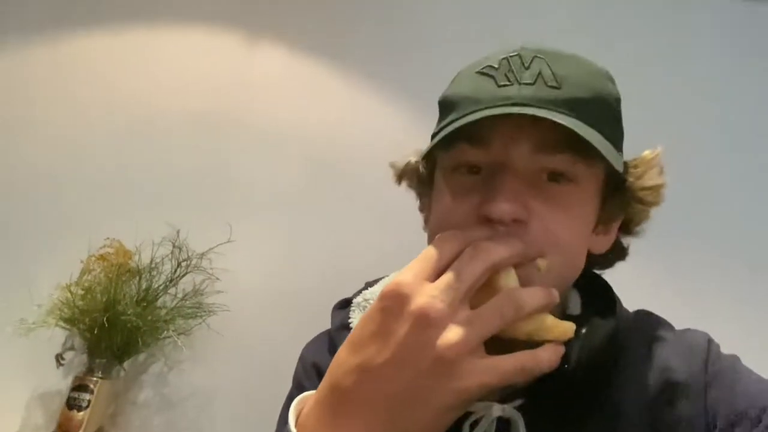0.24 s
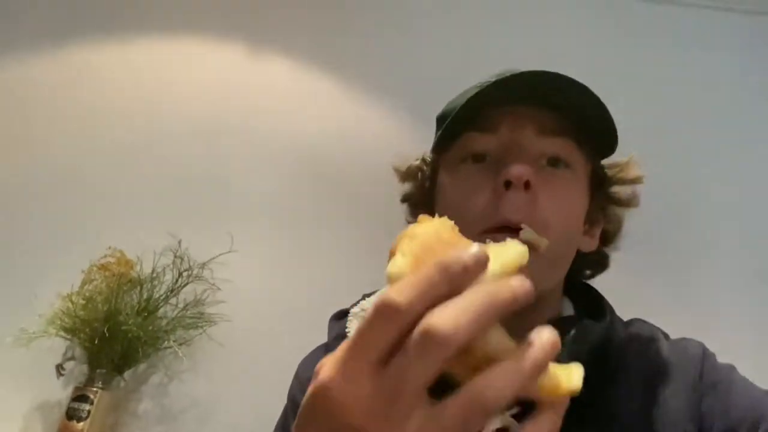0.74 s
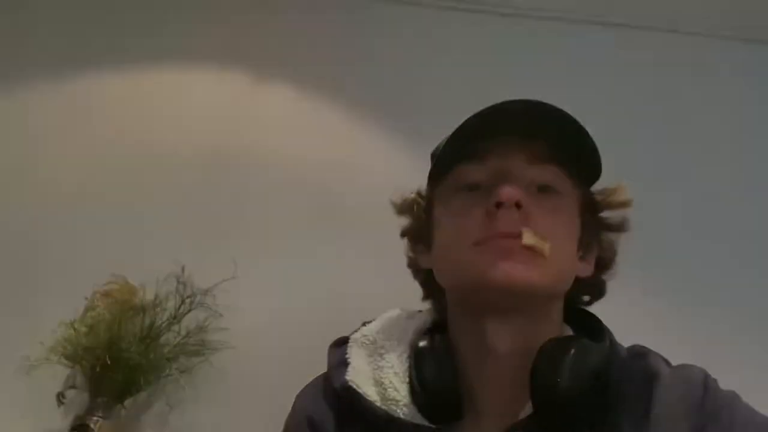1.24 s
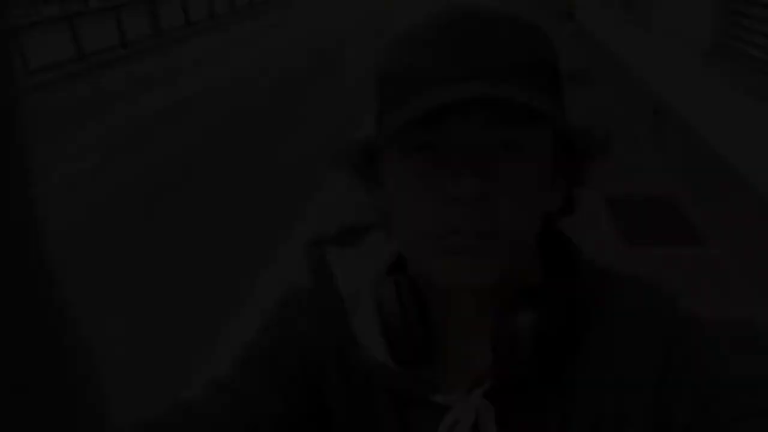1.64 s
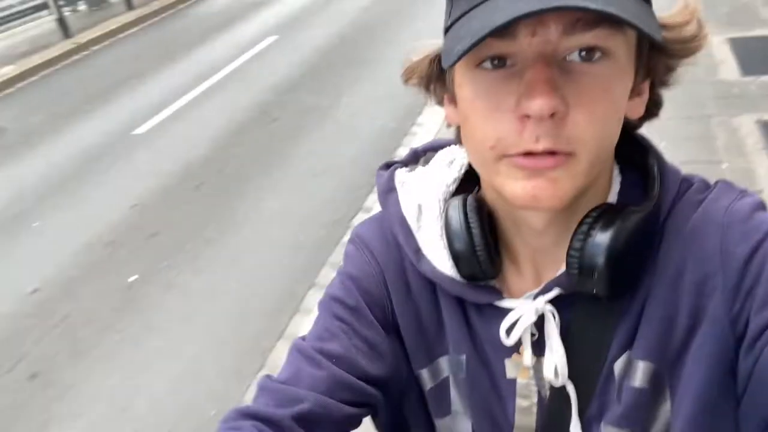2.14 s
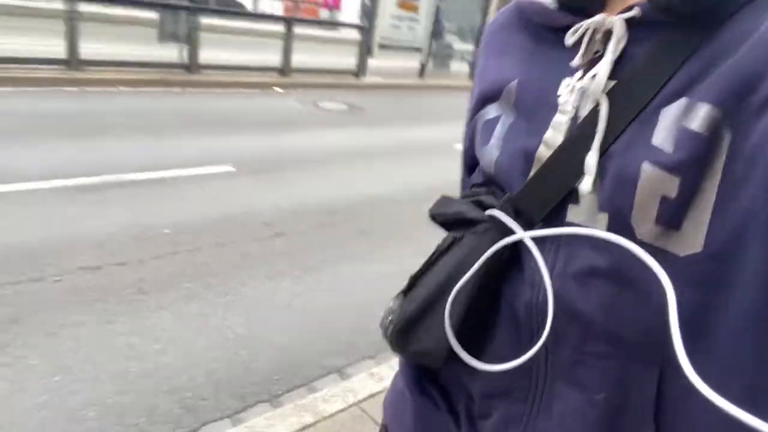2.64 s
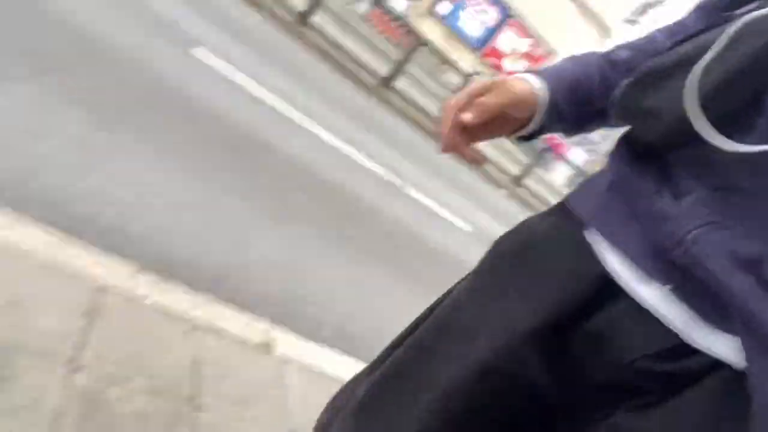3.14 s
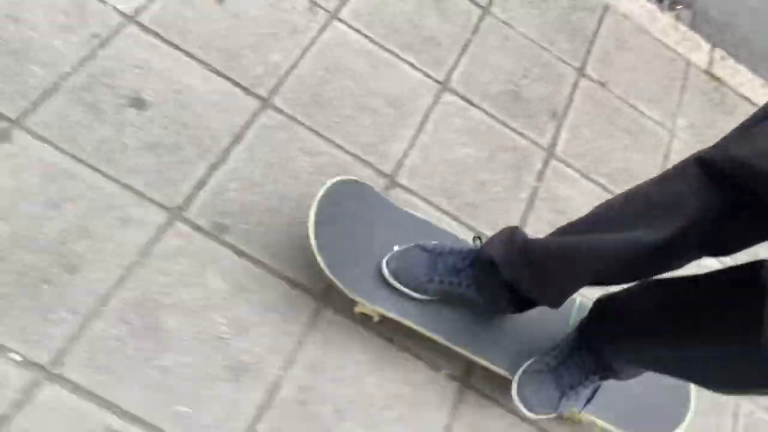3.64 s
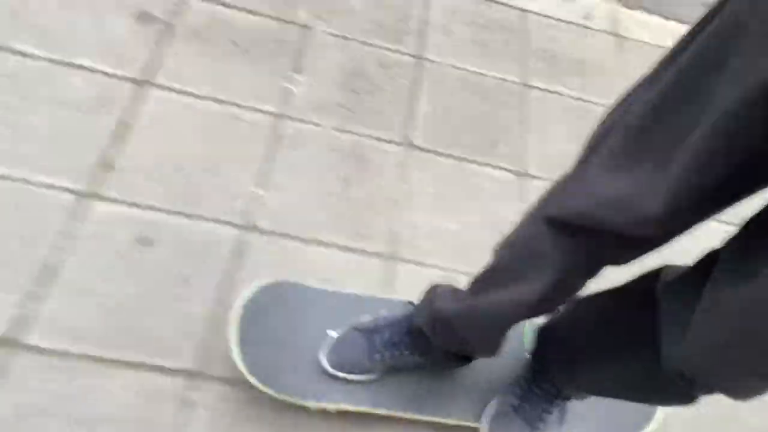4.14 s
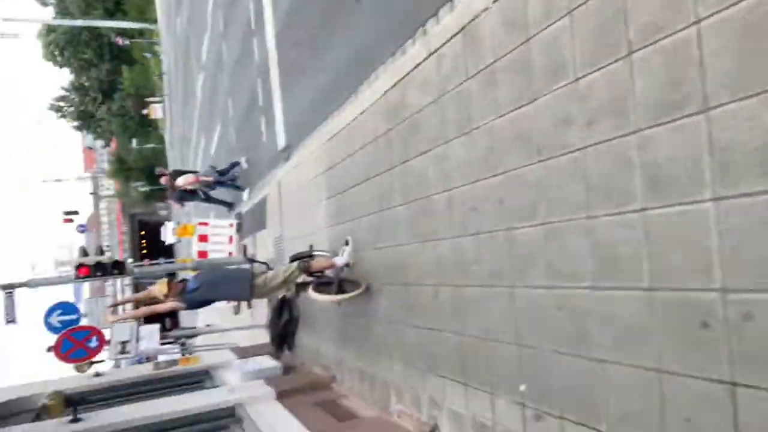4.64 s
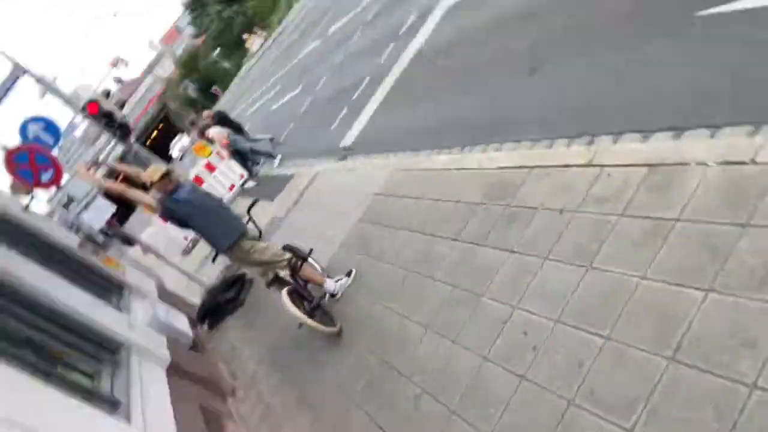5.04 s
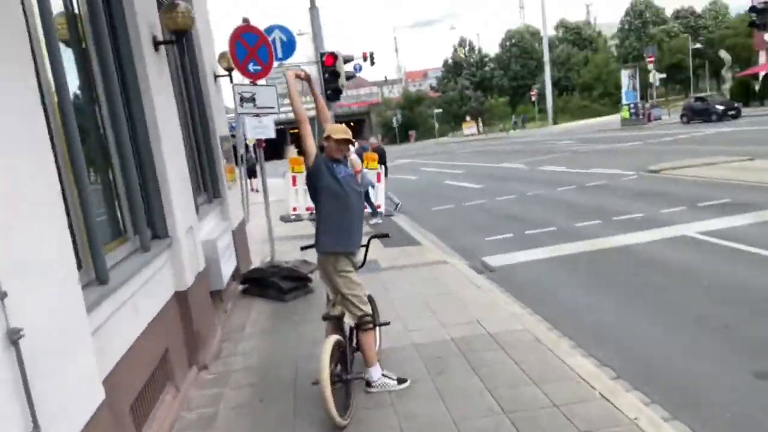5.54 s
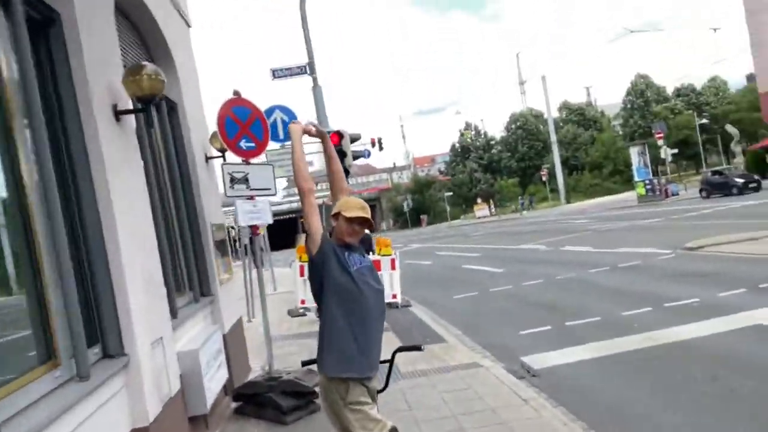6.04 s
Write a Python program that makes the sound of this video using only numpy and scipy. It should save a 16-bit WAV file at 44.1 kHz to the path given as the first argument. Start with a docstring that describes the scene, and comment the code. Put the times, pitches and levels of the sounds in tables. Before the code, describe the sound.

Low appliance hum indoors, then short muffled wind buffets and two tiny bright ticks. A skateboard starts rolling on gritty concrete outdoors: continuous hollow wheel rumble, truck chatter, fine hiss and a fast, slightly uneven clatter over tile joints. The rider holds the microphone near the board, sharpest around the middle, then turns it; the sound shifts right, softens and keeps rolling to the end with little echo.

```python
"""Skateboard on paved sidewalk

A quiet humming room gives way to short gusts of wind and a skateboard rolling along a city sidewalk.
Front and rear axle knock in turn over the tile joints as bursts of decaying modes and filtered noise.
Between the knocks, shaped noise and randomly kicked modes make the wheels rumble on gritty concrete.
The rider swings the microphone round: the board wanders near the middle, swings right, partly returns."""
import sys
import numpy as np
from scipy import signal
from scipy.fft import rfft, irfft, next_fast_len
from scipy.io import wavfile
from scipy.ndimage import uniform_filter1d, map_coordinates

SR = 44100
rng = np.random.default_rng(int(sys.argv[2]) if len(sys.argv) > 2 else 0)


def master_out(mix):
    """Clip the mix to full scale and print it as 16-bit PCM to the path in sys.argv[1]."""
    frames = np.transpose(np.atleast_2d(mix))
    ceiling = np.clip(frames, -1, 1)
    pcm = np.round(ceiling * 32767).astype(np.int16)
    wavfile.write(sys.argv[1], SR, pcm)


N = 277389
TIME = np.arange(N) / SR

# modes of wheels, trucks and small steel parts at each end of the board: (f/Hz, relative level/dB, t60/s)
FRONT_WHEEL = [(504, -2, 0.047), (710, -9.5, 0.071)]
FRONT_TRUCK = [(786, -2, 0.019), (907, 4, 0.03), (1040, -3, 0.031), (1141, 5.5, 0.028), (1280, 0, 0.028),
               (1416, -9, 0.053), (1572, -5, 0.04)]
FRONT_STEEL = [(1863, 3, 0.062), (2023, -1.5, 0.059), (2320, 2.5, 0.03), (3237, -8, 0.075)]
REAR_WHEEL = [(530, -8, 0.056), (679, -8, 0.054)]
REAR_TRUCK = [(887, -5.5, 0.031), (1015, -0.5, 0.049), (1088, 4.5, 0.041), (1312, -3, 0.03),
              (1554, -6, 0.041), (1726, -7.5, 0.024)]
REAR_STEEL = [(1814, -0.37, 0.029), (2213, 0.97, 0.056), (2537, -1.2, 0.031), (2847, -2.6, 0.051)]


def from_db(db):
    """Decibels to gain."""
    return 10 ** (np.asarray(db) / 20)


def rms_one(x):
    """Scale to unit rms."""
    return x / np.sqrt(np.mean(x ** 2) + 1e-20)


def in_time(rows):
    """Each column of a curve table at every sample."""
    s, *columns = np.transpose(rows)
    return [np.interp(TIME, s, column) for column in columns]


def at_hz(points, hz):
    """Read a spectrum on a log-frequency axis."""
    f, value = np.transpose(points)
    return np.interp(np.log(hz + 1e-3), np.log(f), value)


def drift(rate_hz):
    """Smooth random movement of spread 1: lowpassed noise, computed at every 40th sample."""
    pole = np.exp(-2 * np.pi * rate_hz * 40 / SR)
    raw = rng.standard_normal(N // 40 + 2002)
    slow = signal.lfilter([1], [1, -2 * pole, pole * pole], raw)[2000:]
    return np.interp(np.arange(N) / 40, np.arange(len(slow)), rms_one(slow))


def noise(spectrum):
    """Coloured stereo noise, rms 1: its two sides are related in the bass, nearly unrelated in the treble."""
    # how alike the two sides of a noise source are: (f/Hz, left-right correlation)
    likeness = [(30, 0.69), (120, 0.65), (250, 0.54), (600, 1), (1400, 0.4), (1900, 0.022), (6000, 0.018),
                (16000, 0.045)]
    size = next_fast_len(N)
    hz = np.fft.rfftfreq(size, 1 / SR)
    mid, side = rfft(rng.standard_normal((2, size)))
    alike = np.clip(at_hz(likeness, hz), -1, 1)
    both = np.sqrt(1 + alike) * mid + np.sqrt(1 - alike) * side * [[1], [-1]]
    return rms_one(irfft(both * from_db(at_hz(spectrum, hz)), size)[:, :N])


def ring(modes, age, detune, scatter_db, rise_s, apart_hz=1900):
    """One blow on a set of modes; the higher a mode, the more its phase differs between the two sides."""
    hz, level_db, t60 = np.transpose(modes)[:, :, None]
    tune, strength, turn = rng.standard_normal((3, len(hz), 1))
    start = 2 * np.pi * rng.random((len(hz), 1))
    split = turn * np.minimum((hz / apart_hz) ** 3, 1) * np.array([1, -1])[:, None, None]
    waves = np.sin(2 * np.pi * hz * (1 + detune * tune) * age + start + split)
    decay = from_db(level_db + scatter_db * strength - 60 * age / t60)
    return (waves * decay).sum(axis=1) * (1 - np.exp(-age / rise_s))


def kicked(modes, per_s, spread_db):
    """Stone chips standing proud of the concrete kick a set of modes at random; rms 1."""
    happens = rng.random(N) < per_s / SR
    sizes = from_db(spread_db * np.minimum(rng.exponential(1, N), 3)) * happens
    out = np.zeros((2, N))
    for hz, db, t60 in modes:
        pole = from_db(-60 / (t60 * SR))
        turn = 2 * np.pi * hz / SR
        kicks = sizes * (rng.standard_normal(N) + .5 * rng.standard_normal((2, N)))
        resonator = [1, -2 * pole * np.cos(turn), pole * pole]
        out += from_db(db) * signal.lfilter([0, np.sin(turn)], resonator, kicks + 1e-18)
    return rms_one(out)


def place(x, pan_db, lag_ms):
    """Pan and delay between the sides: positive pan is louder on the left, positive lag is later there."""
    lag = lag_ms / 1000
    return np.array([from_db(side * pan_db / 2)
                     * map_coordinates(channel, [(TIME - side * lag / 2) * SR], order=3)
                     for channel, side in zip(x, (1, -1))])


def rightward():
    """Sine of the board's bearing: how far it lies to the right, -1 to 1."""
    # where the board lies from the microphone: (t/s, angle to the right/degrees)
    bearing = [(1.65, 10.5), (2.8, -5), (3.15, -11), (3.65, 2.5), (4.1, -3), (4.5, 40.5), (5.1, 38.5),
               (5.4, 12), (5.85, 6), (6.29, 18.5)]
    return np.sin(np.radians(in_time(bearing)[0]))


def room(fade_s=0.15, end_s=2.14, noise_db=-42, hum_pan_db=4, lag_ms=-0.31):
    """An appliance on the left hums in wavering partials over soft noise; both fade under the rolling board."""
    # partials of the hum: (f/Hz, level/dB, depth of waver)
    partials = [(102.3, -51.5, .35), (172.6, -42, .22), (301, -42.5, .1), (500.6, -49, .25)]
    # colour of the room noise: (f/Hz, relative level/dB)
    room_colour = [(20, -31), (35, -30.5), (48, 1), (70, -18), (200, 1.5), (270, -10), (750, -7.5),
                   (1000, -10), (1500, -15), (2000, -20.5), (5000, -34.5), (9000, -47), (14000, -51.5),
                   (16000, -77)]
    hum = np.zeros(N)
    for hz, db, waver in partials:
        swing = (1 + waver * (drift(11) + 1j * drift(7))) / np.sqrt(1 + 2 * waver ** 2)
        hum += from_db(db) * np.sqrt(2) * np.real(swing * np.exp(2j * np.pi * hz * TIME))
    out = hum * from_db(np.array([[1], [-1]]) * hum_pan_db / 2)
    out = out + from_db(noise_db + 1.0 * drift(1.0)) * noise(room_colour)
    return place(out, 0, lag_ms) * np.clip((end_s - TIME) / fade_s, 0, 1)


def rustles(grain_db=3.5):
    """A sleeve brushes softly past the microphone: swells of grainy noise."""
    # each swell of the cloth: (t/s, level/dB, half length/s)
    brushes = [(0.854, -58, 0.13), (1.432, -53.5, 0.06), (1.547, -52.5, 0.046)]
    # colour of the cloth: (f/Hz, relative level/dB)
    cloth = [(700, -6), (2000, 2), (3100, -5), (5500, -14), (14000, -24)]
    level = sum(from_db(db) * np.exp(-((TIME - s) / half_s) ** 2) for s, db, half_s in brushes)
    return level * from_db(grain_db * drift(120)) * noise(cloth)


def air(wind_gain_db=0.5, gust_gain_db=1.5):
    """Gusts and headwind buffet the microphone as low noise, over low street noise and a finger's rumble."""
    # low street noise, with a finger's handling rumble on the microphone near 1.9 s: (t/s, level/dB)
    low_noise_level = [(1.4, -39), (1.9, -21.5), (2.2, -31), (3.9, -37.5), (4.4, -34.5), (5.2, -34.5),
                       (5.8, -37.5)]
    # light headwind: (t/s, level before gain/dB)
    headwind = [(1.4, -33.5), (2.2, -38.5), (2.75, -37), (3.6, -40), (4.7, -35), (5.3, -34.5), (5.6, -36.5)]
    # gusts: (t/s, level before gain/dB, rise constant/s, hold/s, fall constant/s)
    gusts = [(1.13, -23.5, 0.051, 0.037, 0.022), (1.22, -22, 0.032, 0.034, 0.012),
             (1.293, -27, 0.013, 0.024, 0.04), (1.875, -23.5, 0.12, 0.049, 0.034)]
    # colours of street and handling noise, headwind, and the deeper, wider gusts: (f/Hz, relative level/dB)
    low_noise_colour = [(70, -19), (130, 2), (185, 6), (260, 4), (340, -1), (480, -11), (1000, -24),
                        (3000, -58)]
    wind_colour = [(15, -32), (30, -18), (45, 0), (70, 8.5), (100, -3.5), (150, -6), (300, -36),
                   (1000, -96)]
    gust_colour = [(20, -17), (55, 8), (100, 4), (160, -9), (280, -18), (600, -68)]
    (low_noise_db,), (headwind_db,) = in_time(low_noise_level), in_time(headwind)
    outdoors = np.clip((TIME - .96) / 0.11, 0, 1)
    strength = 0
    for s, db, rise_s, hold_s, fall_s in gusts:
        shape = np.minimum((TIME - s) / rise_s, (s + hold_s - TIME) / fall_s)
        strength = np.maximum(strength, from_db(db + gust_gain_db) * np.exp(np.minimum(shape, 0)))
    out = from_db(low_noise_db) * noise(low_noise_colour)
    for colour, gain in ((wind_colour, from_db(headwind_db + wind_gain_db)), (gust_colour, strength)):
        wind = noise(colour)
        # level the noise first, so the air speed alone sets its strength
        loudness = np.sqrt(uniform_filter1d(np.mean(wind ** 2, axis=0), size=4000))
        out += gain * wind / loudness
    return outdoors * out


def ticks(t60=0.045):
    """Two faint, bright ticks before the board comes in: decaying bursts of narrow-band noise."""
    # ticks: (t/s, level/dB, f/Hz)
    tick_rows = [(1.409, -48, 6500), (1.462, -56, 8000)]
    out = np.zeros(N)
    for s, db, hz in tick_rows:
        age = np.maximum(TIME - s, 0)
        band = signal.butter(2, [hz * .94, hz * 1.06], "band", fs=SR, output="sos")
        burst = rms_one(signal.sosfilt(band, rng.standard_normal(N)))
        out += burst * from_db(db - np.minimum(60 * age / t60, 200)) * (1 - np.exp(-age / 0.0014))
    return out


def rolling(rumble_gain_db=-1.06, chatter_db=-39.0, pebble_db=-39.5, hiss_db=-50.0, rattle_db=-12.0,
            knock_db=-5.0, chatter_follows=1.0, hiss_follows=0.48, chatter_facing=0.57, hiss_side_db=-1.5,
            bump_db=1.4, grain_db=2.0, scuff_db=1.5, patch_db=2.5, hiss_rise_s=0.057,
            start_s=1.583, plain_roll_db=-27):
    """Rough concrete keeps wheels, trucks and steel ringing; coarse patches raise chatter and hiss together."""
    # rumble of the wheels: (t/s, level before gain/dB)
    roll = [(1.68, -27.5), (2.5, -26.5), (4.16, -28.5), (4.5, -28), (5.07, -31), (5.52, -29.5), (6.29, -31)]
    # how squarely the microphone faces the board: (t/s, chatter gain before scaling/dB)
    facing_curve = [(1.6, -1), (2.3, -3), (3.0, 0), (3.6, 1.5), (4.3, -5.5), (4.65, -20), (5.0, -6),
                    (5.5, -2.5), (6.29, 1.5)]
    # the wheels scuff over sand: (t/s, rise of chatter and hiss/dB, half length/s)
    sandy_patches = [(3.884, 7, 0.085), (4.36, 9, 0.035), (4.964, 3, 0.14)]
    # colours of the rolling noise, low to high: (f/Hz, relative level/dB)
    rumble_colour = [(150, -23), (300, -3), (410, 0.5), (520, 4.5), (590, 4.5), (700, 5), (830, -7),
                     (1100, -12), (1600, -29), (4000, -61)]
    chatter_colour = [(600, 1.5), (900, -16), (1100, 3), (1400, -6), (1900, -8), (2600, -35)]
    hiss_colour = [(1300, 14.5), (1900, 18), (2400, 13), (3100, 12.5), (3800, 6.5), (4650, 5), (6500, 2),
                   (9000, -2.5), (13000, -7), (16000, -32)]
    (roll_db,), (facing,) = in_time(roll), in_time(facing_curve)
    effort = roll_db - plain_roll_db
    patches = patch_db * drift(15.6)
    patches += sum(db * np.exp(-((TIME - s) / half_s) ** 2) for s, db, half_s in sandy_patches)

    wheel_knocks = kicked(FRONT_WHEEL + REAR_WHEEL, per_s=70, spread_db=1.5)
    rumble = noise(rumble_colour) + from_db(knock_db) * wheel_knocks
    rumble = from_db(roll_db + rumble_gain_db) * rumble

    pebbles = kicked(FRONT_TRUCK + REAR_TRUCK, per_s=110, spread_db=0.5)
    chatter = from_db(chatter_db) * noise(chatter_colour) + from_db(pebble_db) * pebbles
    chatter = chatter * from_db(chatter_follows * effort + chatter_facing * facing + patches)

    grains = grain_db * drift(250) + scuff_db * drift(42)   # single grains, and short scuffs
    rattle = kicked(FRONT_STEEL + REAR_STEEL, per_s=59, spread_db=3.5)
    gritty = from_db(grains) * noise(hiss_colour) + from_db(rattle_db) * rattle
    hiss = from_db(hiss_db + hiss_follows * effort + hiss_side_db * rightward() + patches) * gritty
    hiss *= 1 - np.exp(-np.maximum(TIME - start_s, 0) / hiss_rise_s)   # the rumble comes first

    under_way = np.clip((TIME - start_s) / .005, 0, 1)
    return (rumble + chatter + hiss) * from_db(bump_db * drift(15)) * under_way


def joints(thump_db=0.0, bounce_db=-0.65, clack_db=0.0, rasp_db=-0.34, crack_db=-0.5, bounce_t60=0.043,
           seated_s=0.019, snap_db=-1.0, snap_s=0.00039, grit_t60=0.051, grit_rise_s=0.00013,
           grain_db=4.0, steel_db=-4.0, plain_clack_db=-25.5, hardness=0.76):
    """Both wheels of an axle drop in ms apart, bounce until seated, shake deck and truck, rasp on the edge."""
    # axle crossings, front and rear in turn, levels before trim: (t/s, wheel bounce level/dB,
    # deck thump level/dB, truck clack level/dB, rasp and steel ring level/dB, grit crack level/dB,
    # second wheel delay/ms, second wheel relative level/dB, bounce f/Hz)
    crossings = [(1.627, -22.5, -30.5, -35, -43, -54, 4.8, 3, 490),
                 (1.695, -24.5, -41, -35, -37, -51, 13.5, 9, 637),
                 (1.759, -22.5, -31.0, -35, -41, -52.5, 11, -5, 490),
                 (1.83, -17.5, -23, -27.5, -32.5, -44.5, 6.7, -9, 660),
                 (1.89, -23.5, -22, -35, -41, -54, 6.8, 10, 530),
                 (1.962, -21.5, -28, -34, -44, -53, 9, -12, 573),
                 (2.022, -17, -30, -26.5, -36.5, -49, 6.7, 4, 685),
                 (2.092, -22, -24, -31.5, -44.5, -49.5, 7.9, -5, 520),
                 (2.151, -24, -23.5, -36.5, -61, -56, 7.2, -3, 515),
                 (2.223, -24, -27, -35, -42, -51.5, 6.1, -9, 552),
                 (2.278, -20.5, -30, -32.0, -42.5, -52.5, 11.1, -4, 584),
                 (2.349, -15, -24.5, -22.5, -35.5, -45, 2.63, -2.5, 675),
                 (2.404, -18.5, -25, -23, -34, -45, 8.8, -8, 633),
                 (2.474, -21, -32, -31, -41, -47.5, 7, -9, 570),
                 (2.53, -29, -28.5, -25, -37.5, -44, 4.1, 1, 610),
                 (2.602, -13.0, -27, -23.5, -31, -41.5, 7.7, -1.5, 620),
                 (2.662, -20.5, -46, -29, -43, -52, 7, -16, 547),
                 (2.735, -12, -28, -21, -33.5, -41.5, 8, -9.5, 610),
                 (2.79, -16, -26.5, -18.5, -32.5, -40, 1.58, -2, 587),
                 (2.86, -17.5, -30, -24.5, -31.5, -41, 7, -5.5, 596),
                 (2.919, -13, -28.5, -23.5, -31.5, -43, 5.6, -16, 666),
                 (2.985, -19.5, -25.5, -24.5, -32.5, -38, 2.6, -5, 700),
                 (3.044, -25, -48, -29.5, -36, -48.5, 4.9, -11, 503),
                 (3.112, -21, -25, -25, -37, -42, 6.5, 5.5, 645),
                 (3.17, -19.5, -26, -23.5, -36.5, -44.5, 4.64, -4, 573),
                 (3.252, -20.5, -27, -25.5, -35, -41, 2.9, -1, 630),
                 (3.316, -13.5, -25.5, -22.5, -39, -42, 5, 6, 630),
                 (3.397, -20.5, -22.5, -21.5, -39, -33, 3.67, -2, 575),
                 (3.46, -20, -28, -20.5, -36.5, -43, 4.85, 16, 540),
                 (3.535, -22, -23, -21, -30, -40, 3.4, 19, 534),
                 (3.605, -15, -27.5, -19, -29.5, -40, 2.9, 8.5, 640),
                 (3.681, -16, -24, -19, -28.5, -42, 2.74, -0.5, 550),
                 (3.743, -20, -33, -20, -32.5, -41, 3.15, 6, 530),
                 (3.818, -21.5, -23.5, -21, -28, -41, 5.6, 9, 604),
                 (3.882, -17, -23, -20.5, -34, -43, 4.06, 5, 636),
                 (3.958, -15, -23.5, -23, -33.0, -42, 2.03, -4, 634),
                 (4.022, -23, -28.5, -22.5, -35, -44.5, 3.8, 11, 674),
                 (4.103, -14, -21, -22.5, -30, -43, 9.8, 3, 632),
                 (4.17, -19, -26.5, -24, -37.5, -45.5, 4.65, -3.5, 603),
                 (4.252, -14, -20.5, -19.5, -25, -39, 9.4, -6, 684),
                 (4.32, -25, -30, -24, -35.5, -43.5, 21, -15, 610),
                 (4.405, -14.5, -19.5, -20.5, -31, -39.5, 3.7, 4.5, 617),
                 (4.476, -18, -31, -22.5, -33.5, -47.5, 3.8, -1, 594),
                 (4.563, -23.5, -25.5, -30, -40, -52, 8.1, -31, 605),
                 (4.631, -16.5, -24, -28, -40.0, -50.5, 3.08, -2, 528),
                 (4.712, -20, -28.5, -29.5, -40.0, -50, 4.26, -4, 606),
                 (4.779, -21.5, -26, -30.5, -50, -56.0, 22, -18, 547),
                 (4.851, -15.5, -21, -26.5, -33.5, -44.5, 9, 4, 560),
                 (4.921, -23, -29, -29, -43, -51.5, 11, -25, 660),
                 (5.003, -14, -50, -24.5, -30, -46.5, 4.3, -10, 656),
                 (5.074, -21, -27, -26, -38.5, -51.5, 13.5, -11, 610),
                 (5.143, -18.5, -33, -26.5, -41.5, -50, 7, -2, 585),
                 (5.215, -19.5, -27.5, -31.5, -41.5, -51, 8.1, 4, 533),
                 (5.298, -17, -32, -26.5, -39.5, -50, 3.47, -4, 653),
                 (5.366, -22.5, -28.5, -35, -48, -56, 10, 1.5, 515),
                 (5.451, -19.5, -30.5, -42, -45, -57, 2, -20, 628),
                 (5.52, -17.5, -33, -25, -31.5, -47.5, 3.3, -2.5, 750),
                 (5.6, -19.0, -30, -33, -40, -50, 3.1, 11, 553),
                 (5.669, -19, -25, -30.5, -43.5, -51, 4.8, -7.5, 570),
                 (5.742, -22.5, -26, -34.5, -39.5, -50, 2.6, -3, 550),
                 (5.817, -20, -30, -26, -33, -45, 6, -7, 565),
                 (5.89, -19.5, -27.5, -30.5, -36.5, -50.5, 3, -2, 687),
                 (5.954, -22.5, -27.5, -33.5, -40, -55, 3.13, 9, 520),
                 (6.032, -24, -30.5, -34, -42, -50, 11, 4.5, 682),
                 (6.106, -27, -31, -31, -35.5, -46.5, 5.8, -11, 630),
                 (6.19, -17.5, -26, -26, -32, -47.5, 12.3, 1.5, 662),
                 (6.26, -23, -29, -28.5, -41, -54.5, 12.7, -10, 650)]
    # deck modes at each end: (f/Hz, relative level/dB, t60/s)
    front_deck = [(177, -3.5, 0.072), (256, -2.5, 0.054), (331, -3.5, 0.086)]
    rear_deck = [(212, -5, 0.072), (329.6, 1, 0.037), (414, -10.5, 0.097)]
    # colours of a wheel on the tile edge and of cracking grit: (f/Hz, relative level/dB)
    rasp_colour = [(1400, -5), (1850, 9), (2120, -6.5), (2400, 2), (3000, -2.5), (3280, -1.5), (3650, -22),
                   (6000, -39)]
    crack_colour = [(2500, -13), (3900, 3), (4650, 7.5), (6500, 1), (9000, 5.5), (13000, -3), (16000, -22)]
    size = int(.08 * SR)
    span = .027 * SR   # part levels are referred to the energy of this many samples
    t = np.arange(size) / SR
    out = np.zeros((2, N + size))
    grit = np.array([noise(rasp_colour), noise(crack_colour)]) * from_db(grain_db * drift(420))
    grit = np.pad(grit, ((0, 0), (0, 0), (0, size)))
    axles = ((front_deck, FRONT_WHEEL, FRONT_TRUCK, FRONT_STEEL),
             (rear_deck, REAR_WHEEL, REAR_TRUCK, REAR_STEEL))
    trims = (bounce_db, thump_db, clack_db, rasp_db, crack_db)
    for k, (s, *levels, lag_ms, second_db, hz) in enumerate(crossings):
        deck, wheel, truck, steel = axles[k % 2]
        # a harder clack is brighter: hardness is dB per octave of tilt for each dB of clack
        tilt_db = hardness * (levels[2] - plain_clack_db)
        truck = [(f, db + tilt_db * np.log2(f / truck[0][0]), t60) for f, db, t60 in truck]
        at = round(s * SR)
        parts, ping = np.zeros((5, 2, size)), 0   # bounce, thump, clack, rasp, crack; and steel
        for delay, gain in ((0, 1), (lag_ms / 1000, from_db(second_db))):
            age = np.maximum(t - delay, 0)
            free = np.exp(-(age / seated_s) ** 4)
            snap = 1 + from_db(snap_db) * np.exp(-age / snap_s)   # first touch is hard
            edge = grit[:, :, at + (age * SR).astype(int)] * snap
            bounce = ring([(hz, 0, bounce_t60)] + wheel, age, detune=0.031, scatter_db=3.5, rise_s=0.0014)
            parts[0] += gain * free * bounce
            parts[1] += gain * ring(deck, age, detune=0.071, scatter_db=2.0, rise_s=0.0023)
            parts[2] += gain * ring(truck, age, detune=0.037, scatter_db=4.5, rise_s=0.00068, apart_hz=2240)
            parts[3:] += gain * edge * from_db(-60 * age / grit_t60) * (1 - np.exp(-age / grit_rise_s))
            ping += gain * ring(steel, age, detune=0.0663, scatter_db=6.0, rise_s=0.00076, apart_hz=2000)
        parts[3] = rms_one(parts[3]) + from_db(steel_db) * rms_one(ping)   # steel rings with the rasp
        for part, level, trim in zip(parts, levels, trims):
            out[:, at:at + size] += from_db(level + trim) * rms_one(part) * np.sqrt(span / size)
    return out[:, :N]


def stones():
    """A wheel hits a loose stone: one light kick on the front wheel and truck modes."""
    # stone hits: (t/s, level/dB)
    hits = [(4.15, -29)]
    age = np.arange(int(.04 * SR)) / SR
    out = np.zeros((2, N))
    for s, db in hits:
        at = round(s * SR)
        kick = ring(FRONT_WHEEL + FRONT_TRUCK, age, detune=0.03, scatter_db=3.0, rise_s=0.001)
        out[:, at:at + len(age)] += from_db(db) * rms_one(kick)
    return out


def street_echo(x, t60=0.44, wet_db=-15, gap_s=0.0047):
    """Pavement, house fronts and the rider's body scatter a short, thin tail of decaying noise."""
    t = np.arange(SR // 3) / SR
    tail = rng.standard_normal((2, len(t))) * from_db(-60 * t / t60) * np.clip((t - gap_s) / 0.0059, 0, 1)
    tail /= np.sqrt(np.sum(tail ** 2, axis=1, keepdims=True))
    return x + from_db(wet_db) * signal.fftconvolve(x, tail, axes=1)[:, :N]


def round_the_hand(x):
    """The board's sound bends round hand and body: lows arrive furthest apart, low mids are shaded most."""
    # body and hand shade one side, then the other: (t/s, left minus right before share/dB)
    shade = [(1.65, -1), (2.05, -5.5), (2.5, -0.5), (2.95, 6.5), (3.15, 4), (3.5, -4.5), (3.8, -5),
             (4.15, -4), (4.6, -2.5), (5.15, -4.5), (5.5, -5), (6.29, -5.5)]
    # how each range reaches the sides: (lower edge f/Hz, share of the shade,
    # left minus right/dB, left lag with the board fully to the right/ms)
    ranges = [(0, 0.2, -0.5, 1), (400, 0.85, 0.5, 0.94), (727, 0.54, -1, 0.64), (1270, 0, -1.8, 0.47),
              (3600, 0, 2.1, 0.5)]
    size = next_fast_len(N)
    hz, spectrum = np.fft.rfftfreq(size, 1 / SR), rfft(x, size)
    above = [1 / (1 + (row[0] / (hz + 1)) ** 16) for row in ranges] + [0]
    (shade_db,), side = in_time(shade), rightward()
    out = 0
    for k, (_, share, pan_db, lag_ms) in enumerate(ranges):
        band = irfft(spectrum * (above[k] - above[k + 1]), size)[:, :N]
        out = out + place(band, share * shade_db + pan_db, lag_ms * side)
    return out


def shared_treble(x, split_hz=7000, lag_ms=0.1907, common=0.99):
    """Above the split both channels carry nearly one signal, the left inverted and slightly late."""
    size = next_fast_len(N)
    hz = np.fft.rfftfreq(size, 1 / SR)
    left, right = rfft(x, size)
    share = np.clip(common, 0, 1) / (1 + (split_hz / (hz + 1)) ** 24)
    late = -right * np.exp(-2j * np.pi * hz * lag_ms / 1000)
    left = np.sqrt(1 - share) * left + np.sqrt(share) * late
    return irfft(np.array([left, right]), size)[:, :N]


def scene():
    """Room, wind, low noise and the board in the street."""
    board = round_the_hand(street_echo(joints() + stones() + rolling()))
    return room() + rustles() + ticks() + air() + board


def record(dry, cutoff_hz=16900):
    """The channels share their treble, the highest peaks are rounded and the top is cut."""
    x = shared_treble(dry)
    rounded = x / (1 + np.abs(x) ** 6) ** (1 / 6)
    return signal.sosfilt(signal.cheby2(14, 70, cutoff_hz, fs=SR, output="sos"), rounded)


dry = scene()
out = record(dry)
master_out(out)
```